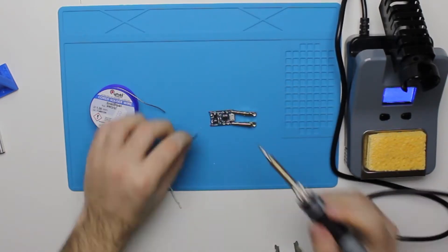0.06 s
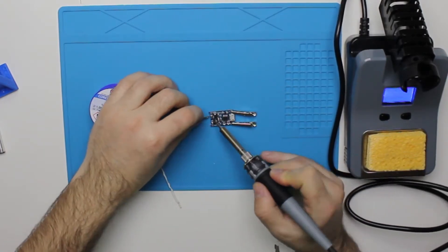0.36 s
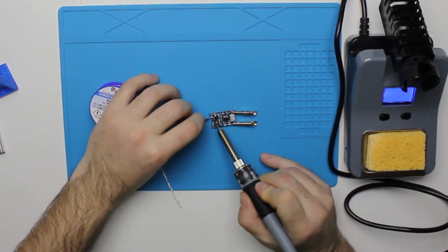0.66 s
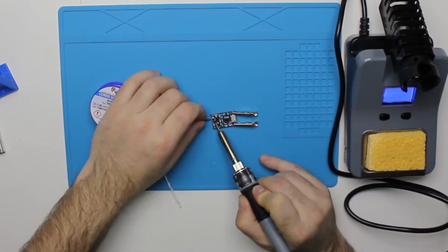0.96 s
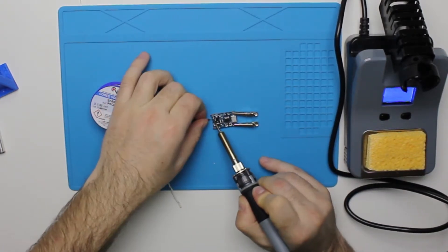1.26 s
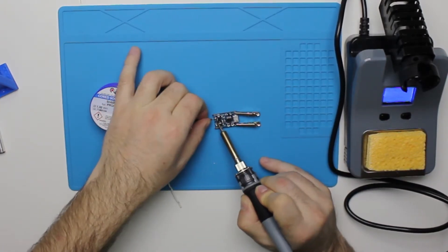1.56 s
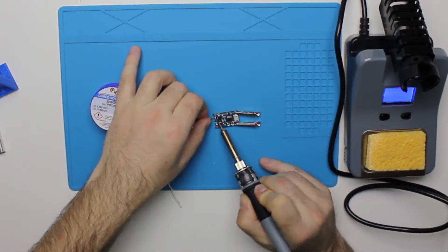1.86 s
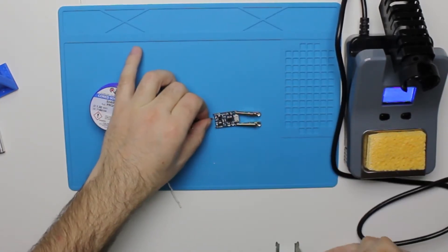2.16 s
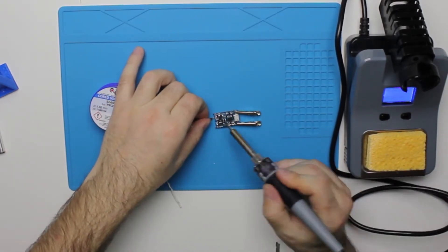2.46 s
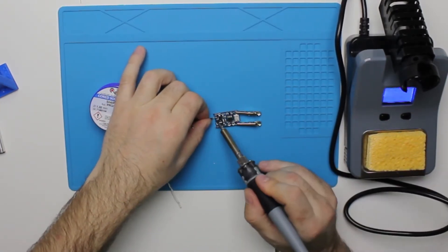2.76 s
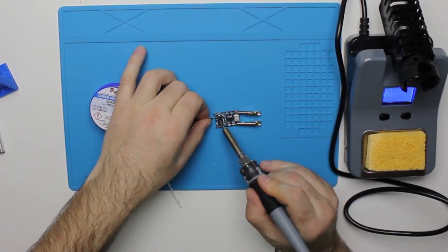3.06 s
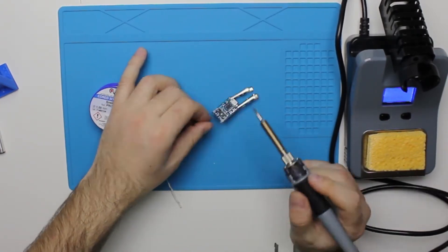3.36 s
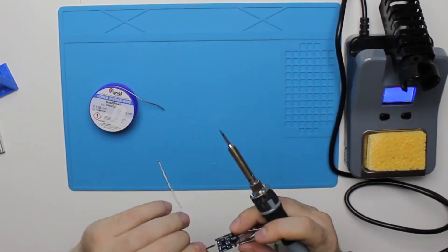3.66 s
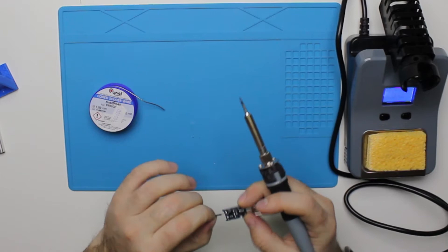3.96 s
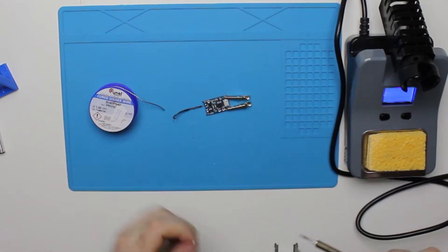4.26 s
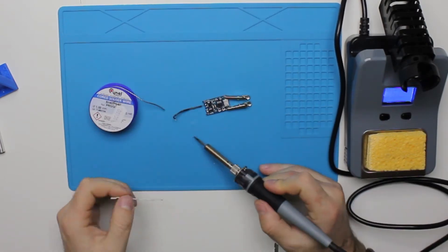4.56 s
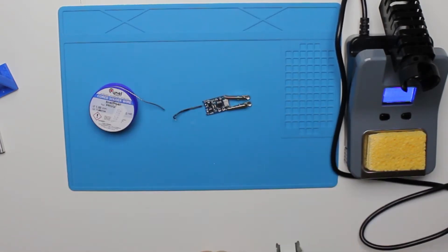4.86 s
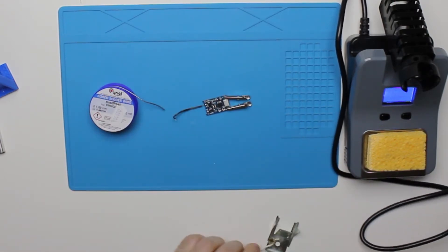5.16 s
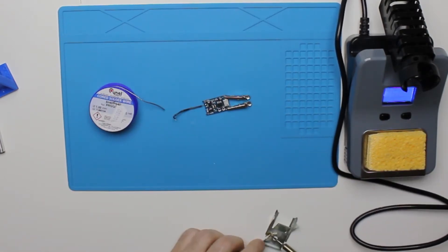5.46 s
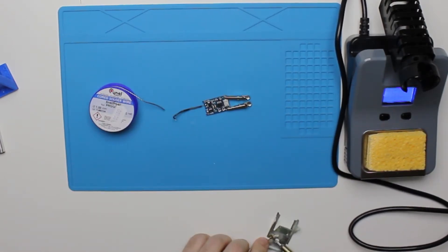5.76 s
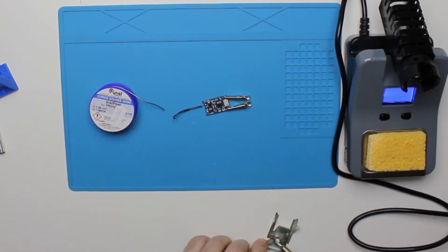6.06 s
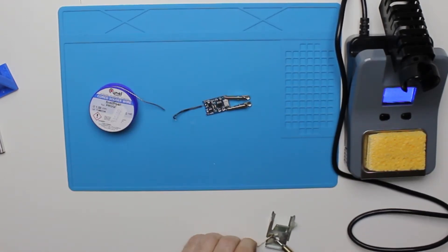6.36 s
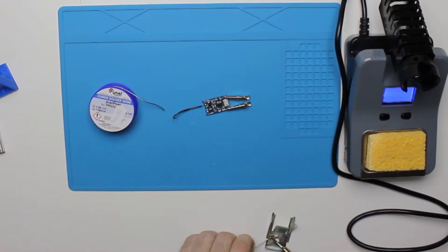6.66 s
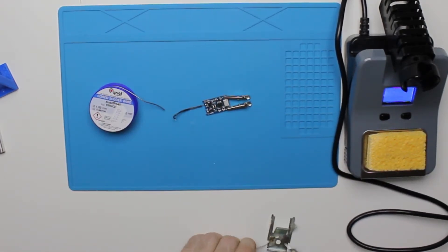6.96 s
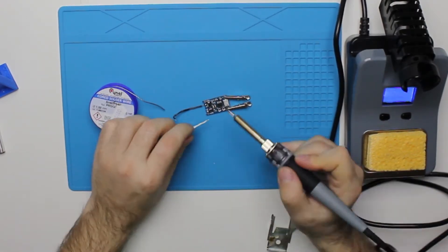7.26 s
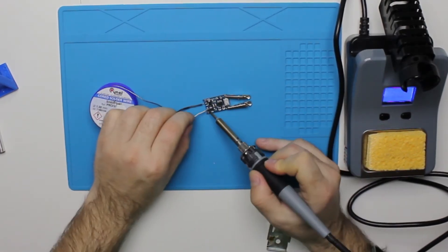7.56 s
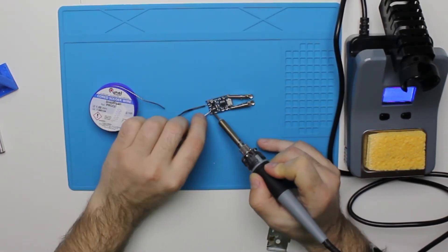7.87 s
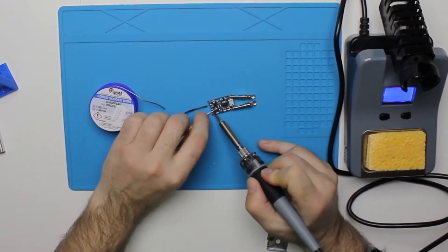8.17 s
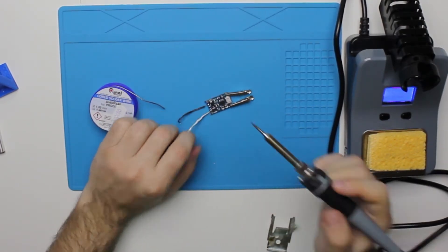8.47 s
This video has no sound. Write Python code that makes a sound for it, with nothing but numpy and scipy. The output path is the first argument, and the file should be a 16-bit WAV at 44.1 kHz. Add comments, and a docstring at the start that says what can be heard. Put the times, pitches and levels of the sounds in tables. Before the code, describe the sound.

A fan runs throughout in a dry room, a soft rush of air with a hum and a wavering whine. Close up, hands brush a rubber mat and a soldering iron clicks at the start. Its tip taps dully on a small circuit board from about 1.2 seconds. A sharp click at 2 seconds leads a cluster of lighter ones, then faint tip taps follow around 3 seconds. Iron, cord and wire click again from 3.4 to 4.7, most sharply at 4.5, with soft bench bumps. Around 5.1 metal scrapes and the iron drops into its stand with a clunk, a jingle and a short squeak. From 5.8 to 7 seconds a small metal part creaks and ticks in the fingers, with tiny high squeaks. Soft rubs, a squeak at 7.5 and faint taps follow, ending with a gentle bench bump near 8.6 seconds.

```python
"""A soldering iron at work on a bench, close up in a dry room.
Its tip taps a small board on a rubber mat, iron and cord click, and it drops into its stand with a
clunk and a jingle. A small metal part creaks in the fingers, metal scrapes and squeaks, and hands
brush the mat and bump the bench. Hits are blows ringing a body's modes; slides are friction noise.
Underneath sits a fan: rushing air, motor hum and a wavering whine."""
import sys
import numpy as np
from scipy import signal
from scipy.fft import rfft, irfft
from scipy.io import wavfile
from scipy.ndimage import uniform_filter1d

SR = 44100
rng = np.random.default_rng(int(sys.argv[2]) if len(sys.argv) > 2 else 0)


def wav_out(sig):
    """Save sig, one row per channel (or a flat mono array), as 16-bit PCM at SR to the path in sys.argv[1]."""
    wavfile.write(sys.argv[1], SR, np.round(np.clip(np.atleast_2d(sig).T, -1, 1) * 32767).astype(np.int16))


N = 379489

# spectral shape of the fan's air: frequency_hz, relative_db
FAN_AIR = [(25, -52), (55, -27), (100, -26), (130, -13), (165, -20.5), (400, -9.5), (690, -7), (820, 2.5),
           (1100, 1), (1600, -1.5), (2100, -6), (3700, -5), (5200, -8.5), (6300, -10.5), (13000, -12.5),
           (15500, -16.5)]
# hum of fan and mains: pitch_hz, level_db
HUM_TONES = [(125, -85), (207, -84.5), (246, -81), (990, -65), (1249, -64), (1732, -63), (2907, -72),
             (3828, -69.5), (4947, -72)]
# hands and tools bumping the bench: start_s, length_s, pitch_hz, level_db
BENCH_THUMPS = [(3.225, .006, 500, -52), (4.193, 0.0094, 430, -48.5), (5.091, .025, 320, -61),
                (5.126, 0.031, 65, -68), (8.564, 0.03, 380, -56), (8.576, 0.036, 184, -51.5)]
# skin and cord sliding over the bench: start_s, length_s, strength_db
BENCH_RUBS = [(0.023, 0.12, -59), (0.087, .09, -53.5), (1.141, 0.014, -48), (1.971, .01, -42.5),
              (3.433, 0.043, -57), (4.736, 0.072, -52), (4.836, .063, -58.5), (7.198, 0.086, -54.5),
              (7.294, 0.035, -53), (8.257, .05, -53), (8.387, 0.042, -56)]
# sliding metal squeaking: start_s, length_s, start_pitch_hz, roughness (0-1), level_db
METAL_SQUEAKS = [(5.258, 0.03, 1302, 0.53, -40.5), (6.026, 0.011, 5900, .05, -48),
                 (6.743, 0.012, 5720, .34, -41.5), (6.787, 0.044, 8650, 0.4, -48.5),
                 (6.866, 0.009, 5860, .08, -48), (7.549, 0.051, 1930, 0.3, -50),
                 (7.546, .042, 2740, 0.6, -47), (7.549, 0.04, 4540, 0.3, -52),
                 (8.039, 0.0082, 3690, .1, -44.5)]
# metal sliding on metal: start_s, length_s, strength_db, brightness_db
METAL_SCRAPES = [(4.956, .012, -48, -3), (5.053, 0.014, -40.5, -1), (5.082, 0.0092, -47, -3),
                 (5.104, 0.016, -40.5, 2), (5.148, .021, -33, 4), (5.166, 0.023, -39, 5),
                 (5.209, .008, -40.5, -10), (5.251, 0.034, -44.5, 5.5), (5.36, 0.011, -48, -2),
                 (5.374, .019, -44, 0), (5.723, .01, -48, -3), (6.333, 0.026, -50.5, -12),
                 (6.586, 0.0089, -47, 4), (6.743, 0.0078, -41, 7.5), (6.789, 0.06, -54.5, 2),
                 (6.862, 0.022, -52, 3)]
# the metal part catching and letting go: start_s, strength_db
CREAK_TICKS = [(5.648, -47), (5.871, -45.5), (5.9023, -32.5), (5.913, -43), (5.9445, -40.5),
               (5.9577, -37.5), (5.9637, -54), (5.9864, -36), (6.0043, -39), (6.0415, -43), (6.1089, -35),
               (6.1461, -44), (6.1729, -46), (6.215, -46), (6.2522, -41.5), (6.273, -45.5), (6.307, -43),
               (6.4776, -34), (6.589, -41.5), (6.937, -39.5), (6.9739, -37.5)]
# the tip tapping the board: start_s, strength_db
TIP_TAPS = [(0.4532, -60.5), (1.159, -36.5), (1.257, -53.5), (1.6598, -54), (1.6944, -56.5), (1.731, -53),
            (1.8116, -43.5), (1.8559, -53), (2.7188, -54), (3.019, -54), (3.0822, -54.5), (3.141, -53.5),
            (3.197, -48.5), (4.1978, -55), (8.1932, -52.5)]
# runs of faint slips, part in the fingers and tip on the board: start_s, end_s, rate_hz, strength_db
CREAK_RUNS = [(5.83, 6.34, 24, -52), (6.535, 6.63, 12, -50), (6.776, 7.01, 25, -52.5)]
TIP_RUNS = [(2.8, 2.95, 23, -59), (8.256, 8.32, 22, -58.5)]
# the iron landing and bouncing in its stand: start_s, strength_db, brightness_db
LANDING_KNOCKS = [(5.1359, -31, -0.5), (5.1379, -30, -7.5), (5.1412, -35, 3), (5.1445, -39.5, 7),
                  (5.1495, -41, 2), (5.2003, -33.5, 0.5), (5.2045, -36.5, -0.5), (5.2175, -55, 5)]
# iron, cord and wire clicking as they move: start_s, strength_db, brightness_db
HANDLING_CLICKS = [(0.1494, -36.5, 0), (0.2187, -48, -10), (1.0948, -51.5, 12.5), (1.4943, -50.5, 4),
                   (1.9822, -23, 5), (1.9971, -43, 3), (2.0844, -39, -2), (2.1154, -32.5, 6.5),
                   (2.2255, -34, -7.5), (2.2977, -33.5, 0.5), (2.3463, -39, 0), (3.411, -44.5, -7),
                   (3.5255, -47.5, 1.5), (3.5981, -45, 0), (4.0699, -43, 8.5), (4.0888, -35, -3),
                   (4.104, -36.5, -6), (4.1458, -44.5, 0), (4.3833, -48, -4), (4.4958, -26, 1.5),
                   (4.728, -41, 5.5), (7.3246, -45, 16.5), (8.42, -43.5, -8.5)]
# resonances of sliding metal, part, board, stand and iron: pitch_hz, width_hz, gain_db
SCRAPE_MODES = [(1290, 360, 6), (2220, 77, 13), (3000, 390, 14.5), (3490, 820, 11), (4850, 920, 10.5),
                (5850, 210, -17), (8400, 580, -3), (10400, 3300, 4.5), (14500, 2500, -18)]
PART_MODES = [(430, 99, -16), (900, 84, -29), (1030, 96, -9), (1157, 105, 8.5), (1230, 59, 5.5),
              (1610, 130, -4.5), (2105, 68, -4), (3120, 630, -6.5), (3600, 400, -7), (4340, 340, -10.5),
              (4610, 240, -2), (4650, 150, -4), (5060, 140, -14), (5750, 56, -3), (6820, 140, -7.5),
              (7400, 260, -7), (8460, 390, -7), (9230, 200, 0), (9570, 260, -7), (11800, 640, -13),
              (13300, 500, -16)]
BOARD_MODES = [(857, 139, 2), (987, 100, 1.5), (1233, 264, 3.5), (1356, 328, 4.5), (1660, 136, -3.5),
               (2077, 47, -10.5), (2360, 250, -18), (2870, 340, -14.5), (3630, 310, -13), (4850, 480, -18),
               (7700, 1900, -29.5), (13800, 2100, -28.5)]
STAND_MODES = [(367, 105, -6.5), (520, 59, -7), (727, 96, 0), (1006, 55, 1.5), (1120, 110, 2.5),
               (1510, 200, 3.5), (1836, 45, 2.5), (2430, 170, -4.5), (3040, 260, -4.5), (4320, 330, -2),
               (5800, 500, -10), (8360, 220, 1.5), (8500, 170, -3), (8800, 250, -3), (9760, 200, -5),
               (10400, 350, -9), (11000, 200, -9), (11400, 350, -8), (12500, 400, -6), (13500, 700, -12)]
IRON_MODES = [(450, 170, -42), (890, 53, -19), (1210, 130, -12), (1258, 145, 21), (1690, 190, 7.5),
              (2110, 210, 7.5), (2920, 270, 12), (3300, 1400, 3), (4730, 1600, 7.5), (5030, 620, -11),
              (6250, 2500, -4.5), (8400, 780, 11), (10200, 2300, 17.5), (12300, 1900, 12.5)]
# the low, mid and treble bands of a contact: low_edge_hz, high_edge_hz
BANDS = [(320, 1900), (1900, 7000), (7000, 16000)]

SPAN = 8192  # samples in one event
AGE_S, EVENT_HZ = np.arange(SPAN) / SR, np.fft.rfftfreq(SPAN, 1 / SR)


def undb(db):
    """Decibels to gain."""
    return 10 ** (np.asarray(db) / 20)


def add(out, start_s, sound):
    """Mix a sound in at its cue."""
    i = int(start_s * SR)
    out[i:i + len(sound)] += sound[:max(N - i, 0)]


def level(x, db, seconds):
    """Scale x to the energy of a sound that holds db for so many seconds."""
    return x * undb(db) * np.sqrt(seconds * SR / np.sum(x ** 2))


def band(x, low_hz, high_hz, order=3):
    """Band-pass."""
    sos = signal.butter(order, [low_hz, min(high_hz, .48 * SR)], "band", fs=SR, output="sos")
    return signal.sosfilt(sos, x)


def wander(rate_hz, size):
    """Smooth random modulation with a spread of about 1."""
    hold = max(int(SR / rate_hz), 1)
    steps = np.repeat(rng.standard_normal(size // hold + 1), hold)
    return 1.285 * uniform_filter1d(uniform_filter1d(steps, hold), hold)[:size]


def resonator(modes, alternate=False):
    """A body's frequency response; neighbouring modes in alternate polarity soften the attack."""
    f = np.maximum(EVENT_HZ, 1)
    sign = -1 if alternate else 1
    return sum(sign ** k * undb(db) / (1 + 1j * (f / hz - hz / f) * hz / width_hz)
               for k, (hz, width_hz, db) in enumerate(modes))


def ring(drive, body):
    """Pass a force through a body's response."""
    return irfft(rfft(drive) * body)


def burst(t60_s):
    """Dense micro-impacts that die away, with energy 1."""
    impacts = rng.standard_normal(SPAN) * undb(-60 * AGE_S / t60_s)
    return impacts / np.linalg.norm(impacts)


def stroke(length_s):
    """Pressure of a sliding contact: it swells and lets go."""
    return np.sin(np.pi * np.minimum(AGE_S / length_s, 1)) ** 0.43


def balance(db, bright_db, low_db, treble_db):
    """Low, mid and treble strength of a contact; brightness tilts it toward the treble."""
    return db + low_db - bright_db, db, db + treble_db + bright_db


def stick_slip(runs, jitter=0.19, scatter_db=0.5):
    """Under steady pressure a contact slips at nearly even gaps; jitter is a share of the gap."""
    slips = []
    for start_s, end_s, rate_hz, db in runs:
        chance = rng.standard_normal(size=(32, 2))
        for due_s, (late, hard) in zip(np.arange(start_s, end_s, 1 / rate_hz), chance):
            slips.append((due_s + jitter * late / rate_hz, db + scatter_db * hard))
    return slips


def hits(cues, body, hardening, chatter_t60_s, chatter_db, echo_t60_s, echo_db, gain_db):
    """A blow drives the low modes, contact chatter the high ones; bench and room add a short tail."""
    out = np.zeros(N)
    blow = 1. * (AGE_S == 0)
    rattle = burst(chatter_t60_s)  # loose parts rattle much alike on every blow
    octaves = np.log2(np.clip(EVENT_HZ, 400, 1400) / 1400)
    usual_low_db = np.median([cue[1] for cue in cues])
    for start_s, *bands_db in cues:
        echo = undb(echo_db) * burst(echo_t60_s)
        chatter = undb(chatter_db) * (burst(chatter_t60_s) + rattle) / np.sqrt(2)
        drives = (blow + echo, blow + chatter + 2 * echo, blow + 2 * chatter + 2 * echo)
        # a harder blow has a shorter contact, so it favours the upper modes
        tilt = undb(hardening * (bands_db[0] - usual_low_db) * octaves)
        for drive, edges_hz, db in zip(drives, BANDS, bands_db):
            gated_ring = ring(drive, body * tilt) * (AGE_S < .15)
            layer = band(gated_ring, *edges_hz, order=4)
            add(out, start_s, level(layer, db + gain_db, seconds=.01))
    return out


def slides(cues, body, grain_db, tail_db, gain_db):
    """Friction: a stream of uneven slips drives the body through the stroke, leaving a short tail."""
    out = np.zeros(N)
    for start_s, length_s, *bands_db in cues:
        slips = rng.standard_normal(SPAN) * undb(grain_db * wander(600, SPAN)) * stroke(1.03 * length_s)
        tail = undb(tail_db) * rfft(burst(t60_s=0.18))
        friction = ring(slips, body * (1 + tail))
        for edges_hz, db in zip(BANDS, bands_db):
            add(out, start_s, level(band(friction, *edges_hz), db + gain_db, length_s))
    return out


def fan(air_db):
    """The bed: rushing air that flutters, over the hum of motor and mains."""
    bins_hz = np.maximum(np.fft.rfftfreq(N, 1 / SR), 1)
    curve_hz, curve_db = np.transpose(FAN_AIR)
    colour = undb(np.interp(np.log(bins_hz), np.log(curve_hz), curve_db))
    air = irfft(rfft(rng.standard_normal(N)) * colour, N)
    flutter = undb(0.85 * wander(6, N) + 0.95 * wander(30, N))
    out = level(air, air_db, N / SR) * flutter
    for pitch_hz, db in HUM_TONES:
        cycles = np.cumsum(pitch_hz * (1 + .0025 * wander(14, N))) / SR
        hum = np.sin(2 * np.pi * cycles) * undb(2.2 * wander(9, N))
        out += level(hum, db, N / SR)
    return out


def fan_whine(centre_hz, swing_hz, period_s, housing_hz, level_db):
    """The motor hunts up and down in speed; its tone flares as it crosses a housing resonance."""
    hunt = 2 * np.pi * (np.arange(N) / SR - .075) / period_s
    pitch_hz = centre_hz + swing_hz * np.cos(hunt) + 2 * wander(6, N)
    motor = np.exp(2j * np.pi * np.cumsum(pitch_hz) / SR)
    housing = 1 / (1 + 1j * (pitch_hz - housing_hz) / 8)
    flutter = undb(1.6 * wander(18, N))
    return level(flutter * np.real(housing * motor), level_db, N / SR)


def bench_thumps():
    """A soft bump pushes just one low, damped mode of the bench."""
    out = np.zeros(N)
    for start_s, length_s, pitch_hz, db in BENCH_THUMPS:
        mode = resonator([(pitch_hz, 0.38 * pitch_hz, 0)])
        push = rng.standard_normal(SPAN) * stroke(length_s)
        add(out, start_s, level(ring(push, mode ** 2), db, length_s))
    return out


def bench_rubs():
    """Skin and cord brush the bench: a soft hiss with no ring."""
    cues = [(start_s, length_s, *balance(db, 0, low_db=-13, treble_db=1.2))
            for start_s, length_s, db in BENCH_RUBS]
    return slides(cues, body=1, grain_db=-5, tail_db=-7, gain_db=-1.5)


def metal_squeaks(sag_hz_per_s, waver):
    """Stick-slip locks on to one unsteady pitch, which sags as the slide slows."""
    out = np.zeros(N)
    for start_s, length_s, start_hz, roughness, db in METAL_SQUEAKS:
        glide_hz = start_hz - sag_hz_per_s * np.minimum(AGE_S, length_s)
        pitch_hz = glide_hz * (1 + waver * roughness * wander(1500, SPAN))
        squeak = np.sin(2 * np.pi * np.cumsum(pitch_hz) / SR) * stroke(length_s)
        add(out, start_s, level(squeak, db, length_s))
    return out


def metal_scrapes():
    """Metal slides on metal: a thin, ringing rasp."""
    cues = [(start_s, length_s, *balance(db, bright_db, low_db=-10.5, treble_db=-2))
            for start_s, length_s, db, bright_db in METAL_SCRAPES]
    return slides(cues, resonator(SCRAPE_MODES), grain_db=0, tail_db=-7, gain_db=1.5)


def part_creaks(usual_db, brightening):
    """The metal part catches in the fingers: the harder it lets go, the brighter the tick."""
    cues = [(start_s, *balance(db, brightening * (db - usual_db), low_db=1.5, treble_db=-10))
            for start_s, db in CREAK_TICKS + stick_slip(CREAK_RUNS)]
    return hits(cues, resonator(PART_MODES), hardening=0.2,
                chatter_t60_s=0.016, chatter_db=2, echo_t60_s=0.066, echo_db=-8, gain_db=-0.65)


def tip_on_board():
    """The tip knocks dully on the board, with only a faint, short echo."""
    cues = [(start_s, *balance(db, 0, low_db=8.5, treble_db=-7.5))
            for start_s, db in TIP_TAPS + stick_slip(TIP_RUNS)]
    return hits(cues, resonator(BOARD_MODES, alternate=True), hardening=0.78,
                chatter_t60_s=0.023, chatter_db=0.5, echo_t60_s=0.046, echo_db=-12, gain_db=2.53)


def iron_in_stand():
    """The stand clunks and jingles at once as the iron lands and bounces."""
    cues = [(start_s, *balance(db, bright_db, low_db=7, treble_db=8))
            for start_s, db, bright_db in LANDING_KNOCKS]
    return hits(cues, resonator(STAND_MODES, alternate=True), hardening=0.39,
                chatter_t60_s=0.038, chatter_db=27, echo_t60_s=0.021, echo_db=-9, gain_db=-1.7)


def iron_clicks():
    """Iron, cord and wire click sharply; the brightness depends on what touches what."""
    cues = [(start_s, *balance(db, bright_db, low_db=-9, treble_db=-7.5))
            for start_s, db, bright_db in HANDLING_CLICKS]
    return hits(cues, resonator(IRON_MODES), hardening=0.11,
                chatter_t60_s=0.024, chatter_db=12, echo_t60_s=0.058, echo_db=1, gain_db=-0.27)


def scene():
    """The mono mix: close handling over the fan bed."""
    bed = fan(air_db=-52)
    bed += fan_whine(centre_hz=804, swing_hz=29.2, period_s=.2752, housing_hz=812, level_db=-61.5)
    iron = iron_in_stand() + iron_clicks()
    friction = metal_scrapes() + bench_rubs() + metal_squeaks(sag_hz_per_s=5800, waver=0.22)
    handwork = bench_thumps() + tip_on_board() + part_creaks(usual_db=-42.5, brightening=0.4)
    return (bed + iron + friction + handwork)[None]


def record(dry):
    """A steep low-pass trims the very top of the mix."""
    cutoff_hz = 15900
    return signal.sosfilt(signal.ellip(10, .2, 70, cutoff_hz, fs=SR, output="sos"), dry)


dry = scene()
out = record(dry)
wav_out(out)
```